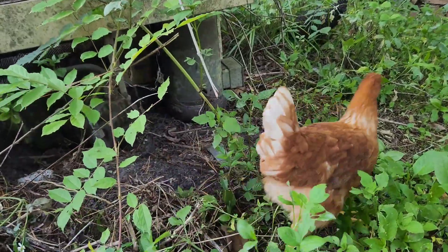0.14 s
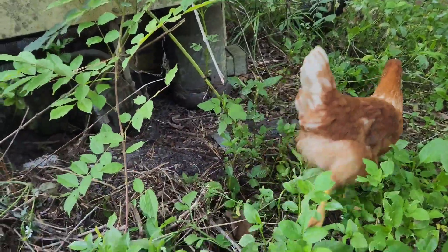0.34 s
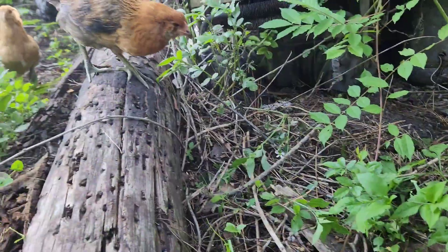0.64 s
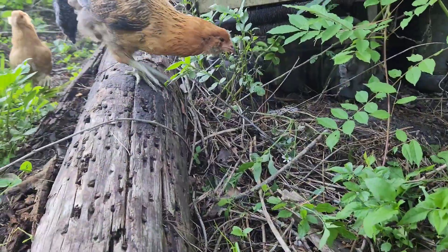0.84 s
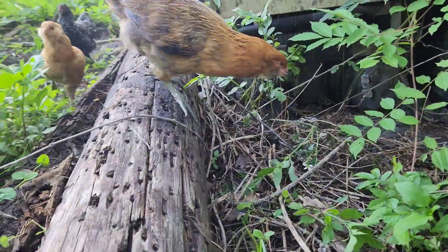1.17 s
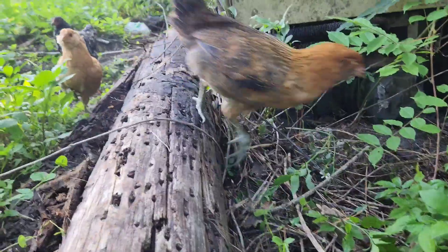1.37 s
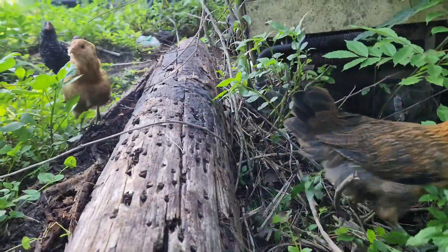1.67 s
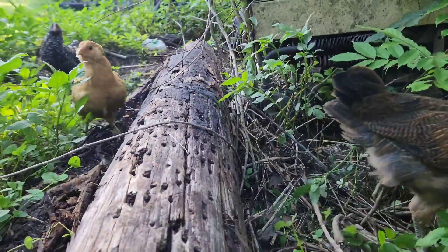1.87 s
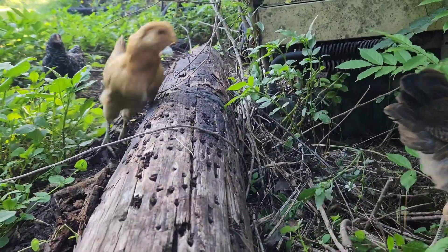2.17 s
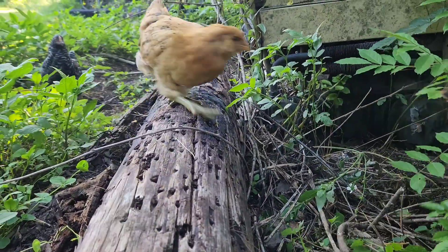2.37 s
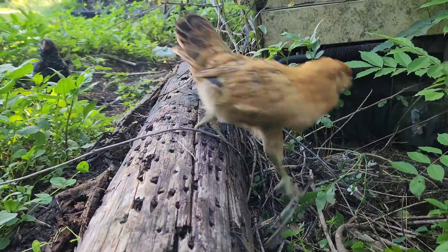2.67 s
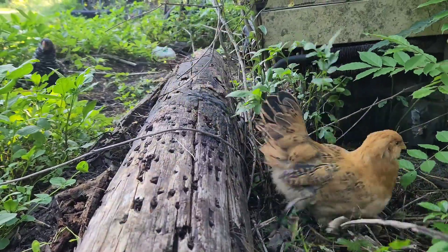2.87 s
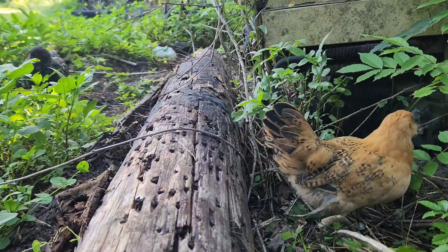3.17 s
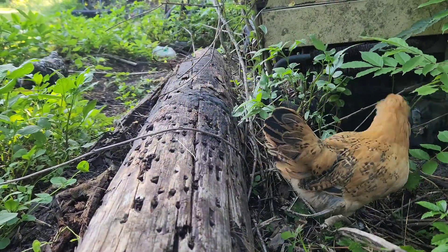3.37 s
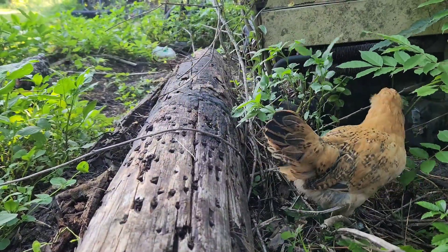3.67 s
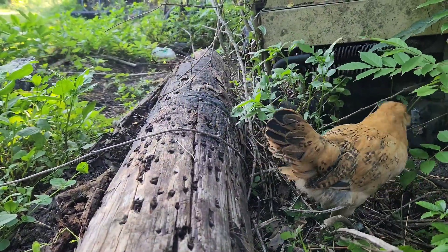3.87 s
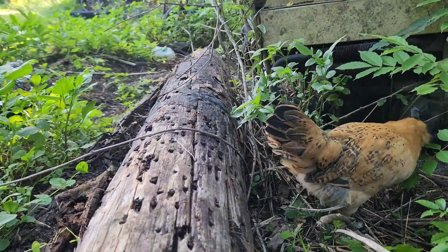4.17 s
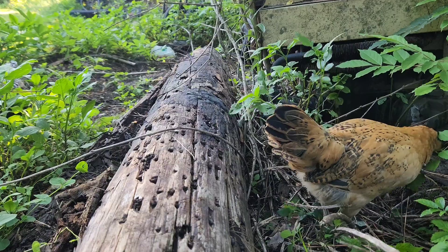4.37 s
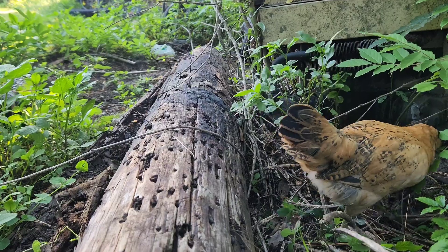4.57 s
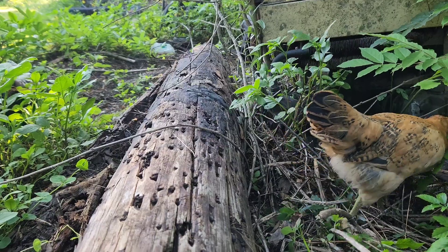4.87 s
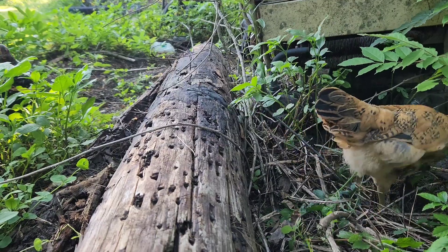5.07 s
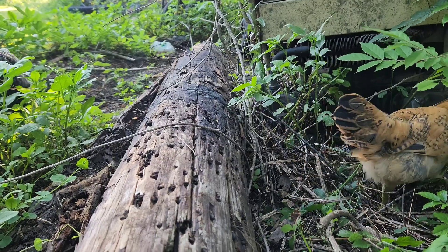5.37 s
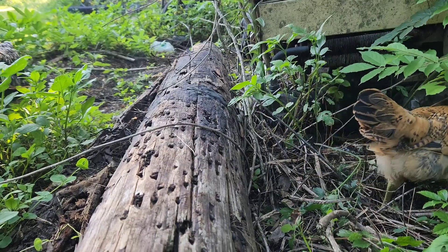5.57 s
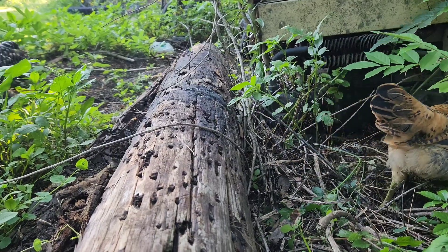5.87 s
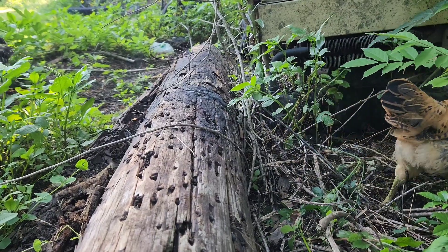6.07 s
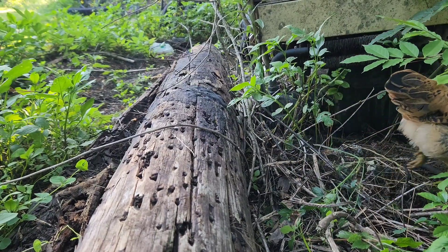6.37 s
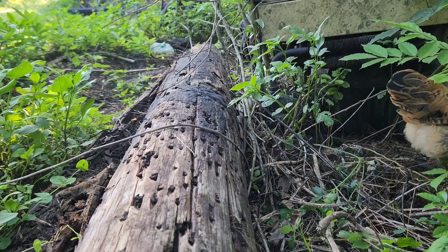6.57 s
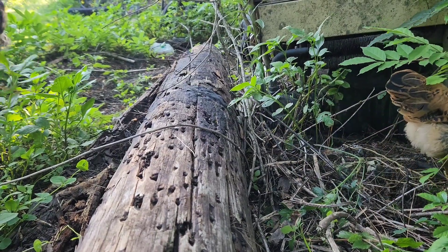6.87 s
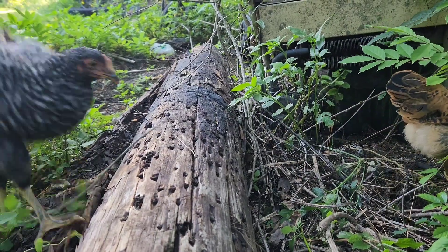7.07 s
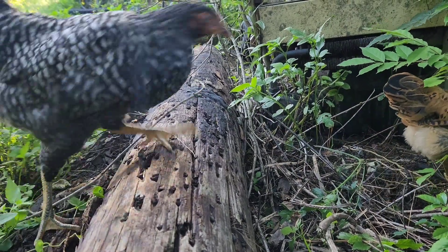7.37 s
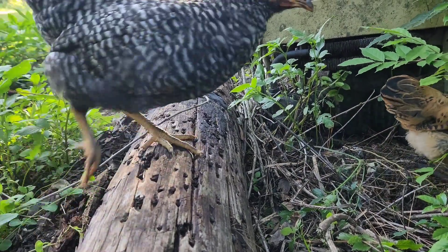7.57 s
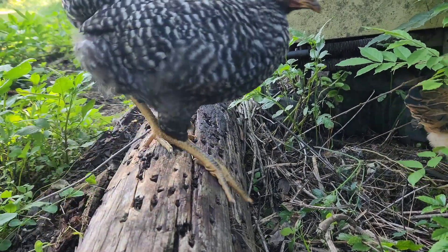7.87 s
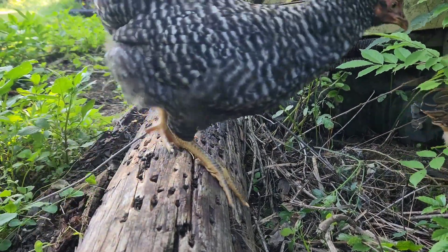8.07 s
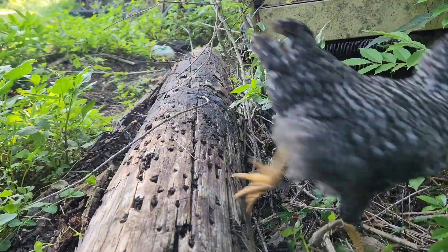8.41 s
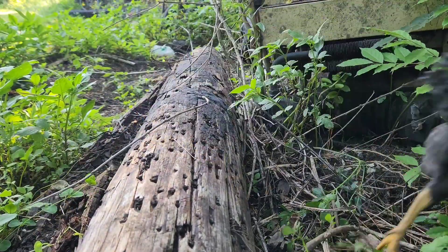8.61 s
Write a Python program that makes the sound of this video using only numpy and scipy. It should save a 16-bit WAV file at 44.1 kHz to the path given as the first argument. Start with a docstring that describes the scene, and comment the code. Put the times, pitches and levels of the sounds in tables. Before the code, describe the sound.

A small flock moves around a log in a leafy yard, heard close in stereo. A heavy crunch opens, followed by a short gap of silence. Young birds peep, a hen clucks quietly, and two clusters of leaf crunches and sharp twig snaps pass over a swelling vehicle drone. It calms to scattered rustling, then wooden claw taps, a repeated echoing songbird phrase and a final soft thud.

```python
"""Feet crunch dry litter over traffic rumble and hiss; at 0.4 s the sound fades, is cut, then fades back in.
Young birds peep, a hen clucks softly, and from 1.5 to 2.9 s crunches and snaps crowd together as an engine hums.
Far peeps, scattered steps and another engine follow; from 6.5 s a songbird repeats a phrase among far trees,
while claws knock on wood until the end. Shaped noise makes the rumble, hiss, litter, snaps and knocks;
sine tones make the birds, engines and foot thuds. Everything reaches two microphone ports."""
import sys
import numpy as np
from scipy import signal
from scipy.fft import rfft, irfft, next_fast_len
from scipy.io import wavfile
from scipy.ndimage import uniform_filter1d, map_coordinates

SR = 44100
rng = np.random.default_rng(int(sys.argv[2]) if len(sys.argv) > 2 else 0)


def store_wav(level_fs):
    """Save 16-bit WAV to argv[1]."""
    pcm = np.round(np.clip(np.atleast_2d(level_fs), -1, 1) * 32767)
    wavfile.write(sys.argv[1], SR, pcm.T.astype(np.int16))


def how_loud(loudness_db):
    """Turn decibels into a plain amplitude multiplier (0 dB gives 1, 20 dB gives 10)."""
    steps = np.asarray(loudness_db, float) / 20
    return 10 ** steps


N = 385476  # length in samples

# a vehicle passes and draws away: start_s, deep_db, drone_db
TRAFFIC = [(0, -39.5, -52.5), (.3, -40, -52), (.6, -48, -46), (.73, -49.5, -49), (.85, -38, -47),
           (1.25, -36.5, -46), (1.6, -36, -41), (1.9, -39, -42), (2.6, -39.5, -47), (3.3, -41, -51),
           (4.3, -44, -51), (5.1, -43, -51.5), (5.4, -47, -53), (6.1, -45.5, -53.5), (6.6, -45, -52.5),
           (7.4, -46, -52), (7.65, -46.5, -55), (8.74, -43, -53)]
# colour of the deep rumble: pitch_hz, gain_db
DEEP_COLOUR = [(12, -44), (20, -5.5), (59, 5), (160, -9.5), (210, -25.5), (350, -120)]
# colour of the traffic drone: pitch_hz, gain_db
DRONE_COLOUR = [(53, -55.5), (90, -6.5), (149, -6), (361, -21), (484, -33), (668, -27.5), (904, -38),
                (1000, -36), (1300, -67.5), (2200, -120)]
# colour of the hiss of far leaves and insects: pitch_hz, gain_db
AIR_COLOUR = [(410, -13), (700, -7), (886, -36), (1040, -4.5), (1520, -7.5), (2080, -5.5), (2840, -7.5),
              (4920, -12.5), (5990, -17), (7490, -6), (10100, -22.5), (14800, -22.5), (16000, -47)]
# how alike far sound is at the two ports: pitch_hz, likeness (0 to 1)
FAR_LIKENESS = [(60, 1), (200, 0.97), (400, 0.6), (800, 0.28), (2000, 0.13), (8000, 0.05)]
# tones of slow vehicles, one list each: start_s, pitch_hz, level_db
ENGINES = [
    [(0.8, 157, -57), (1.75, 171.7, -43), (2.4, 155, -51.5)],
    [(4.8, 256, -65.5), (5.54, 254.5, -52), (5.85, 257, -63), (6.01, 253.4, -49), (6.12, 253.8, -60.5),
     (7.4, 264.2, -56)],
    [(6.5, 63.5, -43), (6.85, 70.7, -48), (8.0, 71.6, -42), (8.3, 66.6, -51)],
]
# one songbird phrase, two falling slurs: start_s (within the phrase), pitch_hz, level_db (relative)
PHRASE = [
    [(0, 4150, -4), (.01, 3900, 5), (.026, 3300, 3), (.04, 2980, 0), (.065, 2920, -4)],
    [(.06, 2350, -4), (.085, 2220, 2), (.115, 1980, 1), (.16, 1650, -9)],
]
# when the songbird repeats its phrase: start_s, level_db (before the trees)
SONG = [(6.542, -69), (6.965, -62), (7.409, -58), (7.845, -57), (8.275, -57.5)]
# near peeps of a young bird: start_s, pitch_hz, level_db, octave_db
PEEPS = [
    [(.585, 1800, -39.5, -80), (.6, 2300, -49.5, -54), (.615, 2600, -52, -47), (.64, 2730, -53.5, -54),
     (.7, 2797, -45, -47.5), (.725, 2710, -45, -49), (.74, 2460, -51, -52), (.76, 1770, -47, -84)],
    [(1.985, 2010, -11, -65), (1.997, 2380, -37, -36), (2.012, 2720, -58, -63), (2.025, 2874, -49, -77),
     (2.07, 2924, -54, -77), (2.1, 2670, -54, -68), (2.13, 2584, -55, -48), (2.185, 2560, -53, -58),
     (2.21, 2130, -43.5, -73), (2.235, 2040, -49, -75)],
]
# higher peeps of another young bird: start_s, pitch_hz, level_db
SQUEAKS = [
    [(.63, 3160, -49), (.65, 3550, -59), (.68, 3740, -49), (.708, 3820, -48), (.722, 3530, -52),
     (.735, 3280, -63)],
    [(.975, 2970, -62), (.983, 3940, -45.5), (.993, 4400, -45), (1.008, 4600, -75), (1.028, 4150, -38),
     (1.05, 2980, -61)],
    [(2.01, 3160, -52), (2.024, 3180, -45), (2.032, 3550, -46), (2.05, 3560, -44), (2.068, 3768, -58),
     (2.08, 3700, -54), (2.095, 3200, -60)],
]
# far peeps and whistles: start_s, pitch_hz, level_db
FAR_PEEPS = [
    [(3.7, 1520, -67), (3.745, 2410, -74), (3.82, 2310, -78), (3.9, 2370, -78)],
    [(3.77, 2200, -66), (3.82, 2050, -66), (3.86, 2000, -72), (3.91, 1956, -63), (4.02, 2025, -76)],
    [(4.05, 2500, -65), (4.085, 1660, -68)],
    [(4.8, 3020, -66), (4.85, 2870, -74)],
    [(4.85, 1175, -69), (5.07, 1290, -66)],
    [(5.0, 1900, -69), (5.07, 2400, -70)],
    [(5.82, 3190, -67), (5.88, 2900, -68)],
    [(5.86, 2050, -67), (5.95, 2420, -72)],
    [(5.775, 2140, -68), (5.8, 3260, -64)],
    [(6.22, 2340, -55), (6.255, 2170, -56)],
    [(6.275, 2085, -61), (6.32, 2050, -60)],
    [(6.475, 2100, -56), (6.53, 2280, -65)],
    [(6.48, 1600, -69), (6.51, 1580, -72)],
    [(7.8, 5030, -63), (7.83, 4460, -62)],
]
# soft clucks of a hen: start_s, length_s, pitch_hz (at the start), level_db (before the soft ends)
CLUCKS = [(.94, .028, 470, -54), (1.0, .025, 520, -59), (4.295, .03, 600, -54), (5.39, .02, 680, -60),
          (6.3, .025, 1030, -61)]
# how the hen's throat passes each overtone: pitch_hz, gain_db
THROAT = [(250, -31), (500, 0), (1000, 2), (1400, -1), (1900, -8.5), (3000, -30)]
# a foot lands with weight on the log or ground: start_s, strength_db, pitch_hz
THUDS = [(0.044, -34, 284), (0.319, -44, 149), (2.347, -54, 147), (4.299, -43, 400), (7.436, -41, 179),
         (8.457, -25, 151)]
# dry twigs and leaf stalks snap: start_s, strength_db, crack_hz, spit_db (against the crack), left_right_db
SNAPS = [(0.012, -31, 2900, -28, 1), (.047, -8.5, 1130, -19, -5), (0.145, -22.5, 2070, -32, 1.5),
         (.333, -23.5, 3860, 7.5, 7), (.878, -61, 6000, 15, 2), (1.137, -51, 1420, 8, 6),
         (1.367, -46, 2600, -21, 1), (1.391, -41.5, 2800, -13, 3), (1.405, -35.5, 4530, -20, -2),
         (1.498, -39, 3470, 17, 3), (1.511, -33, 5090, 8, 8), (1.554, -13, 3530, 5, 4),
         (1.57, -30, 4350, 9, 13), (2.24, -35, 3740, 3.5, 4), (2.391, -45, 3560, 13.5, 2),
         (2.48, -38.5, 3540, 3.5, -1), (2.53, -45, 3580, 7, 1), (2.638, -53, 6000, 12, 1),
         (2.661, -32, 3600, -12, -8), (2.74, -34, 3660, -5, 15), (2.759, -31, 6000, 15, 2.5),
         (2.791, -28, 3270, 12.5, -1), (2.862, -24.5, 4650, 12, 10), (3.349, -51, 1460, 0, 5),
         (3.811, -45, 2050, 4.5, 5), (4.432, -51, 4830, 19, 1), (4.646, -40.5, 5610, 13, 7),
         (5.299, -39.5, 4500, 16, 6), (5.428, -46, 5440, 11, 11), (5.454, -37, 5250, 6, 6),
         (5.516, -37, 2160, 12, 15), (6.008, -45, 5990, 12.5, 5), (6.199, -41.5, 6500, 16, 12),
         (6.327, -38.5, 5360, 7.5, 8.5), (6.563, -40, 4460, 5, 9.5), (6.722, -43, 5680, -3, -2),
         (6.91, -35, 5920, -10, 14), (7.081, -34, 2020, -6, 11), (7.119, -27, 3810, -7, 15),
         (7.356, -26, 1280, -30, 5), (7.374, -31.5, 2250, -18, 4), (7.21, -40, 2500, -2, 6),
         (7.667, -45, 4500, -2, 2), (7.714, -45, 4500, 6, -1), (8.227, -52, 5220, 9, 16),
         (8.287, -51, 4970, 4, 4), (8.425, -39, 2250, 11, -1), (8.54, -45, 9000, 16.5, 11),
         (8.65, -49, 1190, 18, 7), (8.687, -45, 9000, 8.5, 12)]
# claws tap the log and thick sticks: start_s, strength_db, crack_hz, knock_db (against the crack), left_right_db
TAPS = [(0.311, -36.5, 1340, -4, 3), (.322, -26, 1510, 2.5, -10.5), (.593, -51, 1110, 5, 4),
        (1.025, -45, 4100, 5, -1), (1.197, -54, 1370, 3, 4), (1.905, -48, 1980, 8, 18),
        (2.099, -36, 2000, -4, 8), (2.308, -43, 3490, -9, -2), (2.346, -43, 1060, 8.5, 2),
        (2.84, -25, 5980, -4, -4), (2.864, -40, 1000, 3, 2), (2.985, -47.5, 1000, 6.5, 3),
        (3.068, -46.5, 1320, 7, 8), (4.3, -53, 1160, 16, -2), (6.458, -51, 2100, -1, -1),
        (7.135, -36, 1150, 10, 20), (7.237, -31, 1130, -14, 13), (7.298, -34.5, 2150, -2.5, 8),
        (7.351, -30, 2490, -9, 12), (7.398, -41, 1200, 2, 16), (7.435, -41.5, 1003, 10, 7),
        (7.445, -34.5, 1020, -4, 6), (8.454, -32.5, 1020, 5.5, 2), (8.696, -47.5, 1100, 9, 4),
        (8.704, -32, 4650, -1, 1), (8.725, -38, 1100, 7, -1)]
# ringing tones of the wood: pitch_hz, width_hz, gain_db
WOOD = [(390, 700, -3), (658, 112, 4.5), (1130, 156, -2), (1540, 320, -5)]
# time to fall 60 dB for the four parts of a snap: crack_s, spit_s, knock_s, settling_s
SNAP_T60 = (.006, .005, .02, .05)
# colour of twigs rubbing: pitch_hz, gain_db
TWIG_COLOUR = [(300, -28), (700, 0), (1500, -1.5), (4000, -0.5), (7000, -6.5), (12000, -11)]
# colour of dry leaves: pitch_hz, gain_db
LEAF_COLOUR = [(2500, -11.5), (5000, -0.5), (8000, 1), (12000, -4.5), (16000, -3)]
# the flock stirs the litter all around: start_s, level_db, leaf_share_db, left_right_db
RUSTLE = [(0, -59.5, -11.5, 3), (.4, -63.5, -12.5, -0.5), (.55, -76.5, 0.5, 6), (1.45, -78, 0, 2.5),
          (1.65, -60.5, -1.5, 1.5), (2.3, -54, -4, 1), (2.7, -60, -0.5, 2), (3.3, -72, -2, 1),
          (3.9, -90, -5, 6), (4.4, -80.5, 2, 2), (5.3, -61.5, -0.5, 3), (5.7, -57, 0, 3),
          (6.4, -70, -12, 4), (6.9, -60, -1.5, 3), (7.4, -57, -3.5, 3), (7.9, -60, 1, 1),
          (8.2, -76, -11.5, 6.5), (8.74, -46, 3.5, -0.5)]
# a foot presses the litter, which then settles: peak_s, strength_db, press_s, settle_s, leaf_share_db
STEPS = [(.062, -50.5, 0.046, 0.31, -26), (.345, -50.5, 0.072, 0.27, -11), (1.02, -56.5, .08, 0.057, -6),
         (1.2, -58, 0.13, 0.037, 0), (1.41, -59.5, 0.095, .04, -12), (1.506, -33, 0.0089, 0.092, -1.5),
         (1.56, -34, 0.055, 0.068, -1), (1.61, -42.5, 0.1, 0.16, -2.5), (1.91, -45, 0.11, 0.059, -1.5),
         (2.17, -53, 0.12, 0.18, 0), (2.6, -58, .06, 0.031, -1.5), (2.745, -38, 0.013, .15, -1.5),
         (2.795, -29.5, 0.056, 0.019, -1), (2.866, -30, 0.057, 0.058, -2), (2.989, -44, 0.21, 0.063, -1.5),
         (3.08, -53.5, 0.13, 0.09, -1), (3.2, -57.5, 0.027, 0.43, -0.5), (3.35, -49, 0.017, 0.028, -3),
         (3.56, -62, 0.14, 0.31, -5), (4.12, -57.5, 0.032, .15, -4.5), (4.43, -56, 0.41, 0.052, -2),
         (4.66, -49.5, 0.22, 0.067, -1.5), (4.92, -56, 0.035, 0.53, 0), (5.04, -52.5, 0.23, 0.24, -2.5),
         (5.3, -44, 0.012, 0.014, 2), (5.48, -39.5, 0.044, .1, 0), (5.53, -46, 0.17, 0.17, -1),
         (5.87, -53, 0.051, 0.24, 0.5), (6.17, -48.5, .05, 0.28, 3), (6.33, -55.5, 0.24, 0.25, 15),
         (6.62, -49.5, 0.21, 0.065, 0), (6.751, -47, 0.059, 0.14, -0.5), (6.97, -46, 0.42, .15, -1),
         (7.13, -36, 0.052, 0.062, -4), (7.24, -50, 0.25, 0.17, -4), (8.09, -58, 0.11, 0.066, 2),
         (8.231, -43, 0.012, 0.037, -1), (8.288, -53.5, 0.092, 0.043, -0.5),
         (8.449, -38, 0.037, 0.094, -1.5), (8.74, -36.5, 0.076, .1, -18)]


def unit(x):
    """Scale a sound to an rms (average strength) of 1."""
    return x / np.sqrt(np.mean(x ** 2) + 1e-20)


def along(points, hz):
    """Read a curve of (pitch, value) points on a log pitch axis."""
    f, v = np.transpose(points)
    return np.interp(np.log(hz + 1), np.log(f + 1), v)


def curves(rows, t=None):
    """Join the points of each column after the time with straight lines, by default one value per sample."""
    s, *columns = np.transpose(rows)
    if t is None:
        t = np.arange(N) / SR
    return [np.interp(t, s, column) for column in columns]


def wobble(rate):
    """A smooth random curve with rate knots a second."""
    knots = rng.standard_normal(int(N * rate / SR) + 4)
    return map_coordinates(knots, [np.arange(N) * rate / SR])


def filtered(x, response):
    """Change the strength (and timing) of each frequency by response(hz)."""
    m = next_fast_len(x.shape[-1] + 4096)
    return irfft(rfft(x, m) * response(np.fft.rfftfreq(m, 1 / SR)), m)[..., :x.shape[-1]]


def ports(common, own, alike, pan_db, lag=1):
    """Mix shared sound, late at the right port (lag 1 = from the far left), with what each port alone hears."""
    delay_s = lag * 24 / SR  # 24 samples is the longest delay

    def share(hz):
        return np.clip(along(alike, hz), 0, 1)

    def shared(hz):
        return np.sqrt(share(hz)) * np.exp(-2j * np.pi * np.outer([0, delay_s], hz))

    both = filtered(common, shared) + filtered(own, lambda hz: np.sqrt(1 - share(hz)))
    return both * how_loud(np.array([[.5], [-.5]]) * np.asarray(pan_db))


def rush(colour, pan_db, lag):
    """Far stereo noise of rms 1 with a given colour."""
    common, *own = filtered(rng.standard_normal((3, N)), lambda hz: how_loud(along(colour, hz)))
    return unit(ports(common, np.array(own), FAR_LIKENESS, pan_db, lag))


def add(track, s, sound):
    """Mix a sound into the track from time s, in place."""
    part = track[..., round(s * SR):][..., :sound.shape[-1]]
    part += sound[..., :part.shape[-1]]


def whistle(track, rows, start=0, db=0, rough=0.14):
    """A gliding sine tone with soft ends and a fluttering level; a fourth column adds its octave."""
    t = np.arange(rows[0][0], rows[-1][0], 1 / SR)
    hz, *levels = curves(rows, t)
    phase = 2 * np.pi * np.cumsum(hz) / SR
    flutter = 1 + rough * unit(uniform_filter1d(rng.standard_normal(len(t)), size=150))
    tone = sum(how_loud(level + db) * np.sin((k + 1) * phase) for k, level in enumerate(levels))
    add(track, start + t[0], tone * flutter * signal.windows.tukey(len(t), .2))


def echoes(x, t60, delay):
    """Scattered, uneven returns, different at each port, dying by 60 dB in t60 seconds."""
    t = np.arange(int(t60 * SR)) / SR
    lumps = how_loud(3 * np.array([wobble(60), wobble(60)])[:, :len(t)])
    tail = rng.standard_normal((2, len(t))) * lumps * how_loud(-60 * t / t60) * (t > delay)
    return signal.fftconvolve(x[None], tail / np.linalg.norm(tail[0]), axes=1)[:, :N]


def background():
    """Traffic swells as low noise under a thin hiss of far leaves and insects."""
    deep_db, drone_db = curves(TRAFFIC)
    drone_db = drone_db + 1.3 * wobble(4.6)
    deep = how_loud(deep_db + 0.42 * wobble(6.8)) * rush(DEEP_COLOUR, pan_db=0.0, lag=0.54)
    drone = how_loud(drone_db) * rush(DRONE_COLOUR, pan_db=3.5, lag=0.23)
    air = how_loud(-66 + 2.0 * wobble(13)) * rush(AIR_COLOUR, pan_db=0.5, lag=1)
    return deep + drone + air


def engines():
    """Single low engine tones stand out of the rumble, never quite steady."""
    track = np.zeros(N)
    for rows in ENGINES:
        whistle(track, rows)
    uneven = track * how_loud(2.0 * wobble(10))
    return ports(uneven, np.zeros((2, N)), [(1000, 0.6)], 0.92, lag=0.79)


def songbird():
    """A bird repeats two falling whistles, drawn out by scattered echoes from the trees."""
    bird = np.zeros(N)
    for s, db in SONG:
        for slur in PHRASE:
            whistle(bird, slur, s, db, rough=.2)
    # the straight path favours high notes: half strength at 3100 Hz, less below
    straight = filtered(bird, lambda hz: 1 / (1 + (3100 / (hz + 1)) ** 5))
    direct = how_loud(8) * ports(straight, np.zeros((2, N)), [(1000, 1)], 1.3)
    return direct + how_loud(2) * echoes(bird, t60=.42, delay=0.0027)


def chickens():
    """Young birds peep in clean whistles; a hen's cluck is a short falling buzz through the throat."""
    near, far = np.zeros(N), np.zeros(N)
    for rows in PEEPS + SQUEAKS:
        whistle(near, rows, rough=0.27)
    for rows in FAR_PEEPS:
        whistle(far, rows, rough=.4)
    for s, length, hz, db in CLUCKS:
        t = np.arange(int(length * SR)) / SR
        turns = hz * t * (1 - 1.14 * t)  # the pitch falls
        buzz = sum(how_loud(along(THROAT, k * hz)) * np.sin(2 * np.pi * k * turns) for k in range(1, 6))
        add(near, s, how_loud(db) * unit(buzz) * np.hanning(len(t)))
    direct = ports(near, np.zeros((2, N)), [(1000, 0.8)], 4.7, lag=0.16)
    direct = direct + ports(far, np.zeros((2, N)), [(1000, 0.88)], 2.0)
    return direct + echoes(how_loud(-15) * near + how_loud(3) * far, t60=0.13, delay=0.0029)


def thuds():
    """A padded foot gives one short low push: a sine tone that rises fast and dies away."""
    track, t = np.zeros(N), np.arange(SR // 10) / SR
    rise = 1 - np.exp(-t / .003)
    for s, db, hz in THUDS:
        add(track, s, how_loud(db - 60 * t / 0.11) * rise * np.sin(2 * np.pi * hz * t))
    return ports(track, np.zeros((2, N)), [(1000, 1)], 1.5, lag=0.34)


def wood(f):
    """Response of solid wood: a few broad resonances of alternating sign."""
    return sum((-1) ** k * how_loud(db) * 1j * f * width / (hz * hz - f * f + 1j * f * width)
               for k, (hz, width, db) in enumerate(WOOD))


def snaps():
    """Snaps and taps are noise bursts: a pitched crack, a bright spit and a wood knock, with a settling tail."""
    track, t = np.zeros((2, N)), np.arange(SR // 10) / SR
    crack_t60, spit_t60, knock_t60, settle_t60 = SNAP_T60
    swell_s = .0018
    swell = np.minimum(t / swell_s, 1) ** 4  # each burst swells for about 2 ms up to its peak

    def burst(t60):
        return swell * (how_loud(-60 * np.maximum(t - swell_s, 0) / t60) + how_loud(-4 - 60 * t / settle_t60))

    def peak(x):
        return x / np.abs(x[0]).max()

    # a snap has a weak knock (-13.5 dB), a tap has a weak spit (-11 dB)
    breaks = [(s, db, hz, spit, -13.5, pan) for s, db, hz, spit, pan in SNAPS]
    breaks += [(s, db, hz, -11, knock, pan) for s, db, hz, knock, pan in TAPS]
    for s, db, hz, spit_db, knock_db, pan_db in breaks:
        noise = rng.standard_normal((3, 3, len(t)))  # part, then shared / left / right
        crack = filtered(noise[0] * burst(crack_t60),
                         lambda f: 1 / np.sqrt(1 + (2.1 * (f / hz - hz / (f + 1))) ** 2))
        spit = filtered(noise[1] * burst(spit_t60), lambda f: (f / 6000) ** 4 / (1 + (f / 6000) ** 4))
        knock = filtered(noise[2] * burst(knock_t60), wood)
        common, *own = peak(crack) + how_loud(spit_db) * peak(spit) + how_loud(knock_db) * peak(knock)
        pair = ports(common, np.array(own), [(500, 1.0), (2000, 0.24), (8000, 0.12)], pan_db, lag=0.63)
        # tie the peak of both ports together to the peak of the shared sound
        level = np.sqrt(2) * np.abs(common).max() / np.abs(pair.sum(0)).max()
        add(track, s, how_loud(db) * pair * level)
    return track


def crackle(colour, density, spread_db, life, patchy_db):
    """Tiny breaks (density a second, 60 dB decay in life seconds) swell noise whose colour changes in patches."""
    strength = how_loud(spread_db * np.minimum(rng.exponential(size=N), 3.5))
    kicks = (rng.random(N) < density / SR) * strength
    t = np.arange(SR // 50) / SR
    bursts = 1.55 + unit(signal.fftconvolve(kicks, how_loud(-60 * t / life))[:N])
    z = signal.stft(bursts * rng.standard_normal((3, N)), nperseg=256)[2]
    # smooth random patches over pitch and time
    field = uniform_filter1d(rng.standard_normal(z.shape[1:]), size=9, axis=0)
    field = uniform_filter1d(field, size=5, axis=1)
    patchy = signal.istft(z * how_loud(patchy_db * unit(field)), nperseg=256)[1][:, :N]
    common, *own = filtered(patchy, lambda hz: how_loud(along(colour, hz)))
    return unit(common), unit(np.array(own))


def litter():
    """Feet press twigs and leaves over the flock's rustle; the leaf share sets how bright the crunch is."""
    t = np.arange(0, N / SR + .01, .001)
    bed_db, bed_leaf_db, pan_db = curves(RUSTLE, t)
    s, db, press, settle, leaf_db = np.transpose(STEPS)[:, :, None]
    # each step rises 20 dB in its press time and falls 20 dB in its settle time
    slope_s = np.maximum(np.where(t < s, press, settle), .005)
    steps = how_loud(db - 20 * np.abs(t - s) / slope_s) ** 2
    bed = how_loud(bed_db) ** 2
    power = steps.sum(0) + bed
    leafy = ((steps * how_loud(leaf_db)).sum(0) + bed * how_loud(bed_leaf_db)) / power
    rows = np.transpose([t, np.sqrt(power), np.clip(leafy, 0, .98), pan_db])
    level, leaf, pan_db = curves(rows)
    clumps = level * how_loud(1.6 * wobble(30) + 0.6 * wobble(70))
    twig_parts = crackle(TWIG_COLOUR, 500, spread_db=3.0, life=0.01, patchy_db=2.0)
    twigs = ports(*twig_parts, [(1000, 0.28), (8000, 0.27)], pan_db)
    leaf_parts = crackle(LEAF_COLOUR, 700, spread_db=1.0, life=0.0084, patchy_db=3.5)
    leaves = ports(*leaf_parts, [(4000, 0.15), (14000, 0.1)], pan_db)
    return clumps * (np.sqrt(1 - leaf ** 2) * twigs + leaf * leaves)


def scene():
    """Everything at the two ports, from the background to the feet in the litter."""
    return background() + engines() + songbird() + chickens() + thuds() + snaps() + litter()


def low_pass(x):
    """Removes everything above the highest recorded frequency."""
    return signal.sosfilt(signal.butter(12, 16800, fs=SR, output="sos"), x)


def record(dry):
    """Limit the treble, then fade out, cut to near silence and fade in with straight ramps."""
    t = np.arange(N) / SR
    fade_out = np.interp(t, (.33, .423), [1, 0])
    fade_in = np.interp(t, (.5305, .607), [3e-5, 1])
    fade = np.where(t < .4025, fade_out, fade_in)  # the cut ends the first fade early
    limited = filtered(dry, lambda hz: 1 / (1 + (hz / 15650) ** 60))
    return low_pass(limited * fade)


dry = scene()
out = record(dry)
store_wav(out)
```